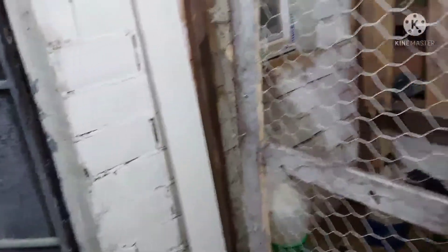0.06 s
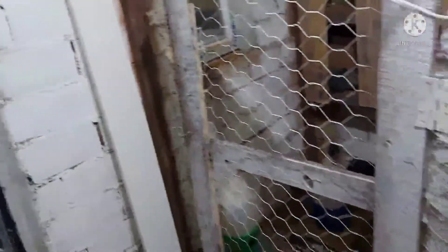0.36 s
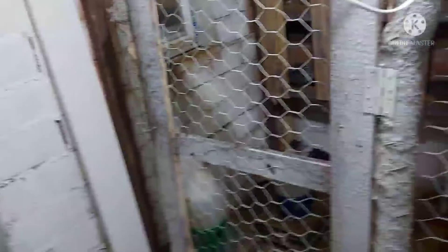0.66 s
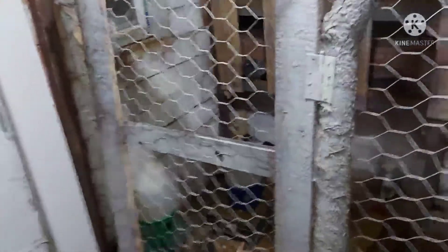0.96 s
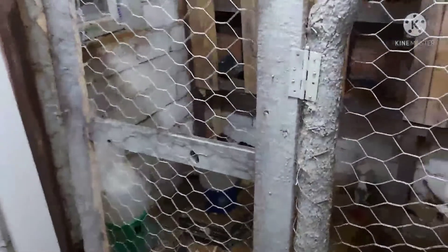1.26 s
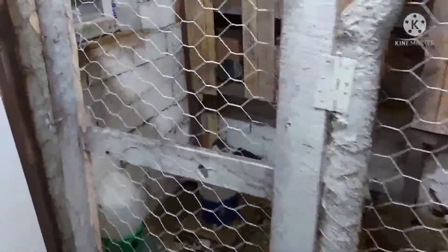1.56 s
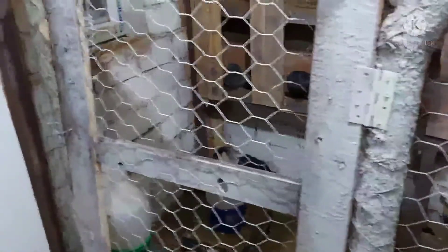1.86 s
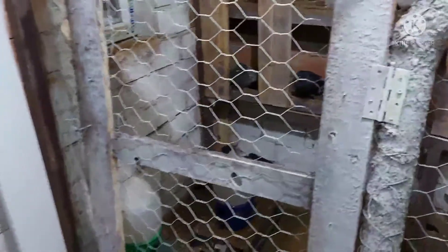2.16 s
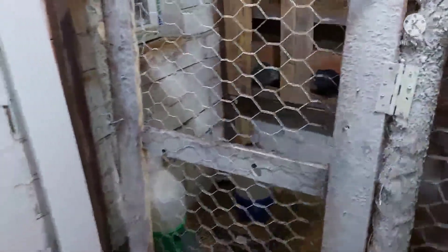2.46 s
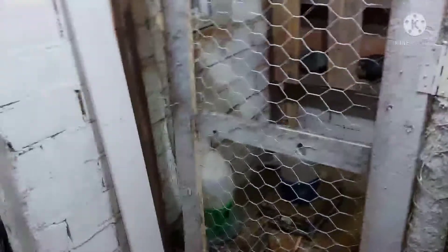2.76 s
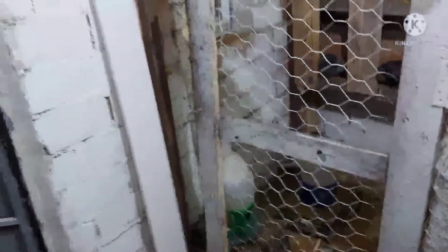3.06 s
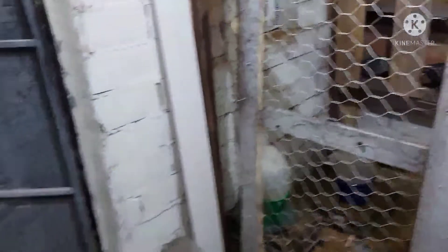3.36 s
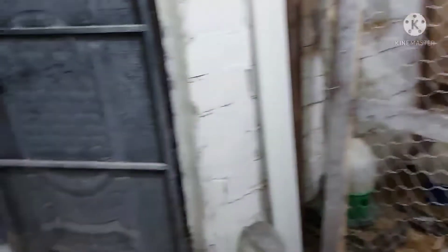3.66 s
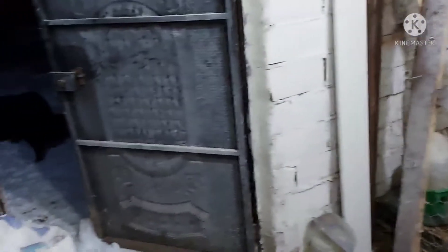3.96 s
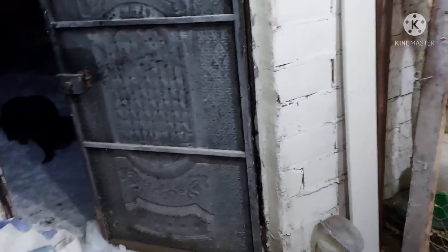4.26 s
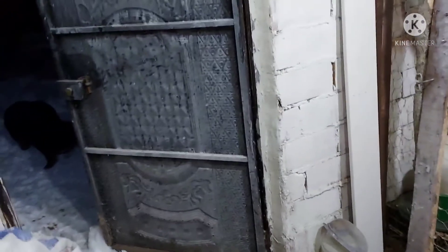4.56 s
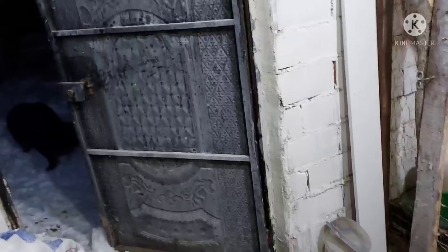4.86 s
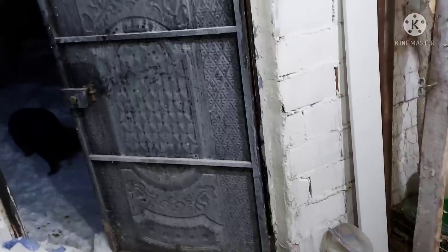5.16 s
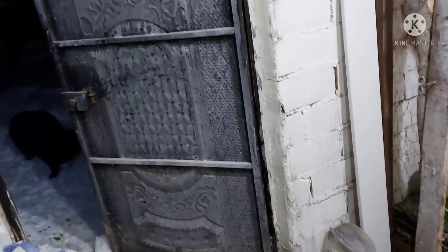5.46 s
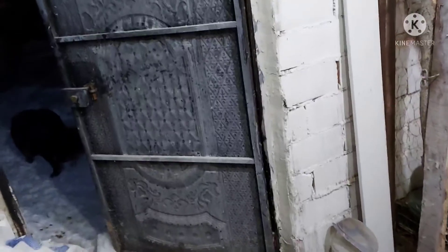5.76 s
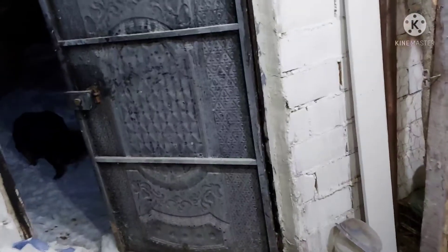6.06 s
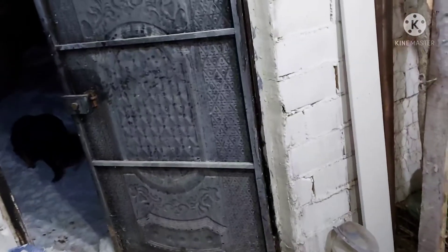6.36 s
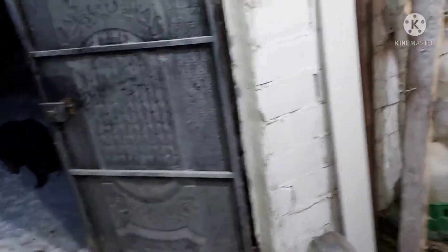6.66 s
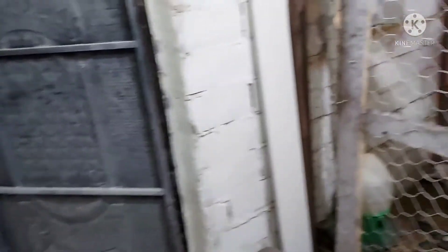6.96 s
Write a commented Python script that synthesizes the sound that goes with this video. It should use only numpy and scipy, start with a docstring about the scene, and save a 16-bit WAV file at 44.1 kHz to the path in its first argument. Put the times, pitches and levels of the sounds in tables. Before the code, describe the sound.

In a very quiet yard, a sheet-metal door a few steps from the microphone slams with a ringing clang, a low boom and a lingering rattle. Soft steps and scuffs follow, then a second, harder slam two seconds later. The hinge groans briefly and the door is nudged, small parts clinking. It knocks against its frame as the latch snaps, and a few faint steps finish.

```python
"""A very still yard at night, a phone microphone a few steps from a sheet-steel door in a brick shed wall.
The hinge squeaks and the door slams at 0.8 s: the panel rings, the leaf flexes, loose metal shivers on.
Feet thud on boards and scuff until a second, harder slam at 2.8 s. The hinge groans at 3.5 s and the door
is nudged, small parts clinking. At 5.5 s it knocks against its frame and the latch snaps.
A few last steps and scuffs follow, over the faint night air."""
import sys
import numpy as np
from scipy import signal
from scipy.fft import rfft, irfft, next_fast_len
from scipy.io import wavfile
from scipy.ndimage import uniform_filter1d

SR = 44100
rng = np.random.default_rng(int(sys.argv[2]) if len(sys.argv) > 2 else 0)


def generate_wav(signal):
    """Clip the signal to [-1, 1] and save it as 16-bit WAV at the path in sys.argv[1]."""
    frames = np.transpose(np.atleast_2d(signal))
    scaled = np.clip(frames, -1, 1) * 32767
    pcm = np.round(scaled).astype(np.int16)
    wavfile.write(sys.argv[1], SR, pcm)


N = 317608
T = np.arange(N) / SR
BANDS_HZ = 40 * 2 ** (np.arange(27) / 3)

# blows on the door, a few steps away (time [s], rise [s], strength [dB], tilt [dB/octave], clang [dB])
DOOR_BLOWS = [(0.687, 0.009, -34.5, 3.5, 3), (0.765, .008, -15.5, -3.5, -7),
              (.789, 0.0031, -7.5, -0.5, -46), (.799, 0.001, -12.5, -4, 8), (.852, 0.0069, -12, 1, -6.5),
              (1.12, 0.015, -29.5, 2.5, 1.5), (2.486, 0.009, -31, 0.6, -8), (2.736, .006, -22, 4, -18),
              (2.751, 0.0012, -7.5, -2, -1.5), (2.781, 0.0049, 0, -2.5, 4), (3.62, 0.0017, -26, -0.5, -8),
              (4.121, 0.011, -34, 0, -8.5), (4.146, 0.0087, -32.5, -1.4, 9), (4.389, 0.046, -44, 4.5, 4.5),
              (4.998, 0.023, -25.5, 1.5, -2.5), (5.509, 0.0044, -30, 0.7, -3),
              (5.524, 0.0024, -15.5, -2, -1.5), (5.547, 0.0023, -26, -4, 5.5)]
# the panel's clear modes (frequency [Hz], relative level [dB], t60 [s])
PANEL_MODES = [(147.1, -9, 0.46), (197.2, -10, 0.28), (247.5, -9, 0.17), (306.7, -1.5, 0.29),
               (484.8, -4.5, 0.31), (510, -7.5, 0.14), (610, -5.5, 0.24), (674, -9.5, 0.28),
               (744, -15.5, 0.17), (788, -13.5, 0.25), (854, -8.5, .25), (983, -7, 0.22),
               (1040, -15.5, 0.085), (1141, -9, 0.29), (1235, -15.5, 0.11), (1317, -11, 0.067),
               (1503, -18, .2), (1540, -19.5, 0.2), (1747, -13.5, 0.15), (1930, -19.5, .26),
               (2240, -21, 0.25), (2560, -29, 0.24)]
# its crowd of unresolved modes (frequency [Hz], relative density [dB])
CROWD_SPECTRUM = [(60, -4.5), (130, -10), (300, -1), (520, -6), (900, -3), (1400, -7), (2000, -11.5),
                  (3000, -18.5), (5500, -24.5), (9000, -31.5), (15000, -33)]
# how long the crowd rings (frequency [Hz], t60 [s])
CROWD_T60 = [(100, 0.49), (250, 0.33), (600, .24), (1500, .22), (4000, 0.29), (14000, 0.66)]


def blows(bands, crowd_db=-15, modes_db=-20.5, chatter_db=1.5, chatter_above_hz=600):
    """Each blow rings the clear modes and the crowd between them; the edge chatters against the frame."""
    out = np.zeros((2, N))
    chatter = unit(undb(chatter_db * walk(450)))
    for s, rise, *contact in DOOR_BLOWS:
        gains = band_gains(CROWD_SPECTRUM) * undb(crowd_db + blow_db(*contact, BANDS_HZ))
        for hz, band, gain, t60 in zip(BANDS_HZ, bands, gains, at(CROWD_T60, BANDS_HZ)):
            where, t = span(s, rise + t60)
            grain = chatter[where] if hz > chatter_above_hz else 1
            out[:, where] += band[:, where] * gain * grain * swell(t, rise, t60)
        # every blow lands on another spot, so the modes start in new phases
        turns = rng.random(len(PANEL_MODES))
        sides = rng.choice([-1, 1], len(PANEL_MODES))
        for (hz, db, t60), turn, side in zip(PANEL_MODES, turns, sides):
            where, t = span(s, rise + t60)
            phase = 2 * np.pi * (hz * t + turn)
            ring = microphones(np.sin(phase), side * np.cos(phase), hz)
            out[:, where] += ring * undb(modes_db + db + blow_db(*contact, hz)) * swell(t, rise, t60)
    return out


def blow_db(strength_db, tilt_db, clang_db, hz, clang_hz=756, clang_octaves=1.1):
    """Harder contact adds treble; the open panel clangs in the midrange more than the edge does."""
    clang_shape = np.exp(-(np.log2(hz / clang_hz) / clang_octaves) ** 2)
    return tilted(strength_db, tilt_db, hz) + clang_db * clang_shape


# the whole leaf flexing (time [s], rise [s], frequency [Hz], level [dB], free swing [s])
LEAF_BOOMS = [(0.77, 0.12, 66.4, -27, 0.33), (2.773, 0.035, 70.8, -27, 0.39),
              (4.127, 0.072, 65.9, -50, 0.23), (4.593, 0.044, 67.6, -48.5, 0.41),
              (4.984, 0.031, 65.8, -56, .11), (5.544, 0.044, 64.5, -42.5, 0.417),
              (6.884, 0.068, 67.2, -58.5, .11)]


def booms(t60=0.72, catch_s=0.03):
    """The leaf swings in its lowest mode until caught; the pitch depends on how it rests in the frame."""
    out = np.zeros(N)
    # every footfall stirs the same low mode
    stirred = [(s, STEP_RISE_S, 65.2, thump_db - 4.5, 0.15) for s, thump_db, _ in FOOTFALLS]
    for s, rise, hz, db, swing_s in LEAF_BOOMS + stirred:
        where, t = span(s, rise + t60)
        free = np.clip(1 - (t - swing_s) / catch_s, 0, 1)
        out[where] += undb(db) * np.sqrt(2) * np.sin(2 * np.pi * hz * t) * swell(t, rise, t60) * free
    return out


# the leaf settling against the frame (time [s], level [dB])
FRAME_KNOCKS = [(4.166, -37.5), (5.546, -21)]


def knocks(hz=322, rise=0.001, t60=0.11):
    """The hollow frame answers in one short mode."""
    out = np.zeros(N)
    for s, db in FRAME_KNOCKS:
        where, t = span(s, rise + t60)
        out[where] += undb(db) * np.sqrt(2) * np.sin(2 * np.pi * hz * t) * swell(t, rise, t60)
    return out


# loose metal on the door (time [s], level [dB], t60 of the tones [s])
SLAM_SHIVERS = [(0.819, -38.5, 1.58), (2.8, -41.5, 1.955)]
# its buzz (frequency [Hz], relative density [dB])
BUZZ_SPECTRUM = [(80, -1), (300, 1.5), (600, -4.5), (1200, -4.5), (2300, -5), (4200, -13), (7000, -20),
                 (15000, -23.5)]
# its clearest tones (frequency [Hz], relative level [dB])
LINGERING_TONES = [(867, -17.5), (2020, -15), (3040, -21), (3760, -18), (5760, -28.5)]


def shivers(bands, rise=0.012, flutter_db=0.75, rattle_db=1.2):
    """Loose sheet and wire buzz on after each slam; the highest fizz stops first."""
    out = np.zeros((2, N))
    t60_shares = at([(4000, 0.91), (9000, 0.7)], BANDS_HZ)
    for s, db, t60 in SLAM_SHIVERS:
        where, t = span(s, t60)
        for band, gain, share in zip(bands, band_gains(BUZZ_SPECTRUM), t60_shares):
            out[:, where] += undb(db) * gain * band[:, where] * swell(t, rise, t60 * share)
        for hz, tone_db in LINGERING_TONES:
            out[:, where] += undb(db + tone_db) * noise(hz, hz / 25, len(t)) * swell(t, rise, t60)
    return out * undb(flutter_db * walk(77)) * unit(undb(rattle_db * walk(600)))


# small loose parts such as bolt and wire (time [s], frequency [Hz], width [Hz], level [dB])
PART_CLINKS = [(0, 1300, 2380, -54), (.488, 820, 577, -68.5), (0.686, 1720, 687, -46.5),
               (0.71, 265, 88.4, -47), (0.85, 8200, 9000, -29.5), (1.119, 8600, 10200, -40),
               (1.163, 274, 155, -51), (1.221, 3100, 160, -61), (1.236, 560, 265, -50.5),
               (2.013, 1450, 1550, -53.5), (2.275, 1350, 806, -61), (2.345, 630, 195, -63),
               (2.484, 1480, 280, -44.5), (2.785, 1590, 606, -22.5), (3.952, 754, 150, -65),
               (4.124, 8000, 8900, -55), (4.15, 4200, 1980, -55.5), (4.58, 6250, 9060, -59),
               (4.582, 1670, 600, -66.5), (4.955, 995, 1000, -45), (5.091, 7240, 12140, -47),
               (6.002, 9100, 10000, -56), (7.121, 290, 89.7, -63.5)]
# higher parts die sooner (frequency [Hz], t60 [s])
PART_T60 = [(300, 0.25), (1500, .23), (8000, 0.023)]
# the latch's modes (frequency [Hz], width [Hz], level [dB], t60 [s])
LATCH_MODES = [(2380, 590, -33, 0.24), (4010, 1030, -41, 0.15), (9060, 500, -52, 0.13)]


def clinks(rise_cycles=1.8, latch_s=5.524, latch_rise_s=0.003):
    """Small parts rattle in one resonance each, narrow ones starting softly; the latch rings in several."""
    out = np.zeros((2, N))
    parts = [(s, rise_cycles / width, hz, width, db, at(PART_T60, hz)) for s, hz, width, db in PART_CLINKS]
    latch = [(latch_s, latch_rise_s, *mode) for mode in LATCH_MODES]
    for s, rise, hz, width, db, t60 in parts + latch:
        where, t = span(s, 0.6)
        out[:, where] += undb(db) * noise(hz, width, len(t)) * swell(t, rise, t60)
    return out


# the hinge just before the first slam (time [s], pitch [Hz], level [dB])
HINGE_SQUEAK = [(0.56, 4106, -87), (0.57, 4130, -79), (0.684, 4350, -59), (0.735, 4460, -58.5)]
# the hinge after the second slam (time [s], pitch [Hz], level [dB])
HINGE_GROAN = [(3.52, 239, -60), (3.566, 249.6, -44), (3.652, 241, -52), (3.702, 239, -59),
               (3.72, 238, -57)]


def hinge(curve, waver, flutter_db):
    """The dry pin sticks and slips at a wavering rate."""
    s, hz, db = np.transpose(curve)
    slip_hz = np.interp(T, s, hz) * (1 + waver * walk(81))
    phase = 2 * np.pi * np.cumsum(slip_hz) / SR
    turning = (T > s[0]) & (T < s[-1])
    gain = undb(np.interp(T, s, db) + flutter_db * walk(70)) * turning
    return np.sqrt(2) * gain * microphones(np.sin(phase), np.cos(phase), hz[0])


# dull, hollow footfalls on boards behind the door (time [s], relative thump [dB], relative grit [dB])
FOOTFALLS = [(1.236, -62, -105), (1.463, -55.5, -62), (2.119, -65.5, -70), (3.222, -43, -82),
             (3.411, -64, -69.5), (3.72, -49, -70.5), (4.385, -45.5, -71.5), (4.58, -49.5, -66),
             (5.999, -49, -71), (6.789, -58, -69.5)]
STEP_RISE_S, STEP_T60_S = 0.018, 0.41


def footfalls(bands, thump_hz=220, fall_db_per_octave=10.5):
    """Every step thumps the boards, falling off towards the treble, with even grit above it."""
    fall_db = fall_db_per_octave * np.log2(np.maximum(BANDS_HZ / thump_hz, 1))
    moves = [(s, STEP_RISE_S, STEP_T60_S, np.maximum(thump_db - fall_db, grit_db))
             for s, thump_db, grit_db in FOOTFALLS]
    return soles(moves, bands, low_cut_hz=88, crunch_db=1, gain_db=-4.5)


# scuffs and rustles (time [s], nominal length [s], relative level [dB], tilt [dB/octave])
FOOT_SCUFFS = [(0.075, 0.19, -69, 1.9), (.15, 0.99, -82.5, 2), (1.612, 0.16, -59.5, 0.5),
               (1.694, 0.56, -70.5, 0), (2.02, 0.25, -67.5, -1.5), (2.258, 0.57, -73, -0.5),
               (2.506, 0.37, -70, -0.3), (3.752, 0.1, -72.5, 2.5), (4.765, 0.28, -56.5, -0.5),
               (5.426, 0.14, -76, -5), (5.612, 0.26, -68, -3), (6.144, 0.34, -68.5, -1),
               (6.34, .21, -65.5, -2.1), (6.543, 0.12, -62, -1.4), (6.704, 0.41, -67.5, 1),
               (7.036, 0.48, -66.5, -1)]


def scuffs(bands, hollow_hz=850, hollow_db=2, rise_share=0.33, t60_per_length=2.67):
    """A longer scuff builds and fades more slowly; all are a little hollow between rumble and hiss."""
    dip_db = hollow_db * np.exp(-np.log2(BANDS_HZ / hollow_hz) ** 2)
    moves = [(s, length * rise_share, length * t60_per_length, tilted(db, tilt_db, BANDS_HZ) - dip_db)
             for s, length, db, tilt_db in FOOT_SCUFFS]
    return soles(moves, bands, low_cut_hz=185.8, crunch_db=1.5, gain_db=-6)


def soles(moves, bands, low_cut_hz, crunch_db, gain_db):
    """Soles press and slide: a soft thump below, uneven crunching above."""
    out = np.zeros((2, N))
    crunch = unit(undb(crunch_db * walk(500) + crunch_db / 2 * walk(45)))
    low = BANDS_HZ < 600
    for s, rise, t60, colour_db in moves:
        where, t = span(s, rise + t60)
        gains = undb(gain_db + colour_db) / np.sqrt(1 + (low_cut_hz / BANDS_HZ) ** 6)
        thump = np.tensordot(gains * low, bands[:, :, where], 1)
        grit = np.tensordot(gains * ~low, bands[:, :, where], 1)
        out[:, where] += (thump + grit * crunch[where]) * swell(t, rise, t60)
    return out


def walls(x, count=6, echo_share=0.33):
    """Brick and boards close by scatter the treble back within milliseconds, which makes it hollow."""
    treble = signal.sosfiltfilt(signal.butter(2, 1500, "high", fs=SR, output="sos"), x)
    lags = (SR * rng.uniform(0.001, 0.012, count)).astype(int)
    echoes = sum((-1) ** k * np.pad(treble, ((0, 0), (lag, 0)))[:, :N] for k, lag in enumerate(lags))
    return x - treble + np.sqrt(1 - echo_share) * treble + np.sqrt(echo_share / count) * echoes


# the quiet yard all around the microphones (frequency [Hz], relative density [dB])
AIR_SPECTRUM = [(40, -6), (70, 13), (150, -4), (320, -5), (600, -9.5), (2500, -15), (6000, -11),
                (12000, -4.5), (15500, -14.5)]


def night_air(bands, db=-77):
    """Still air: a faint, steady rumble and hiss."""
    return undb(db) * np.tensordot(band_gains(AIR_SPECTRUM), bands, 1)


# likeness of the phone's two microphones (frequency [Hz], correlation [0-1])
MIC_LIKENESS = [(60, 0.93), (200, 0.92), (380, 0.75), (700, 0.32), (1300, 0), (2400, 0.11), (5000, 0)]
# their balance (frequency [Hz], left minus right [dB])
MIC_BALANCE = [(100, -1), (700, 3.5), (1300, -1.2), (2400, -1.5), (4400, -5), (8000, -1.5), (15000, 0.2)]


def microphones(mid, side, hz):
    """Left and right: alike in the bass, unrelated in the treble."""
    likeness = at(MIC_LIKENESS, hz)
    lean_db = at(MIC_BALANCE, hz) / 2
    common = mid * np.sqrt((1 + likeness) / 2)
    apart = side * np.sqrt((1 - likeness) / 2)
    return np.array([(common + apart) * undb(lean_db), (common - apart) * undb(-lean_db)])


def noise(hz, width_hz, size):
    """Stereo noise of rms near 1 in a resonance, its deepest fades evened out."""
    n = next_fast_len(size)
    bins_hz = np.arange(n // 2 + 1) * SR / n
    resonance = 1 / (1 + (2 * (bins_hz - hz) / width_hz) ** 4)
    x = irfft(rfft(rng.standard_normal((2, n))) * resonance, n)[:, :size]
    power = uniform_filter1d(x ** 2, int(SR * max(2 / width_hz, 0.01)))
    mid, side = x / np.sqrt(power + 1e-18)
    return microphones(mid, side, hz)


def band_gains(spectrum):
    """Third-octave gains of total power 1 for a spectrum per Hz."""
    gains = undb(at(spectrum, BANDS_HZ)) * np.sqrt(BANDS_HZ)
    return gains / np.linalg.norm(gains)


def tilted(db, tilt_db, hz, pivot_hz=1000, flat_below_hz=200):
    """Level at a frequency for a slope in dB per octave."""
    return db + tilt_db * np.log2(np.maximum(hz, flat_below_hz) / pivot_hz)


def span(s, length):
    """The samples from s on, and the time since s."""
    start = int(s * SR)
    where = slice(start, min(start + int(length * SR), N))
    return where, T[where] - T[start]


def swell(t, rise, t60):
    """Build up over the rise time, then die away."""
    return np.minimum(t / rise, 1) * np.exp(-np.log(1000) * np.maximum(t - rise, 0) / t60)


def walk(rate, points=8000):
    """A random curve of spread near 1, changing rate times a second."""
    return 1.5 * np.interp(T * rate, np.arange(points), rng.standard_normal(points))


def at(table, hz):
    """Read (Hz, value) points on a log-frequency axis."""
    points_hz, values = np.transpose(table)
    return np.interp(np.log(hz), np.log(points_hz), values)


def undb(db):
    """Decibels to gain."""
    return 10 ** (np.asarray(db) / 20)


def unit(x):
    """Scale to rms 1."""
    return x / np.sqrt(np.mean(x ** 2))


def scene():
    """Door, hinge and feet from a few steps away, over the night air."""
    bands = np.array([noise(hz, hz / 4, N) for hz in BANDS_HZ])
    other_bands = bands[:, :, ::-1]  # read backwards, the noise is unrelated to that of the blows
    door = walls(blows(bands) + clinks()) + knocks() + booms() + shivers(other_bands)
    squeak = hinge(HINGE_SQUEAK, waver=0.007, flutter_db=2.5)
    groan = hinge(HINGE_GROAN, waver=0.03, flutter_db=3.5)
    # under a moving sole each band comes and goes on its own
    flicker = np.array([unit(undb(2 * walk(35))) for _ in BANDS_HZ])
    restless = bands * flicker[:, None]
    feet = footfalls(restless) + scuffs(restless[:, :, ::-1])
    return door + squeak + groan + feet + night_air(other_bands)


def record(dry, ceiling=0.97, bass_hz=50, top_hz=15200):
    """The phone drops the deepest bass, rounds the loudest peaks and cuts the top."""
    heard = signal.sosfilt(signal.butter(4, bass_hz, "high", fs=SR, output="sos"), dry)
    rounded = ceiling * np.tanh(heard / ceiling)
    return signal.sosfilt(signal.ellip(12, 0.2, 80, top_hz, fs=SR, output="sos"), rounded)


dry = scene()
out = record(dry)
generate_wav(out)
```